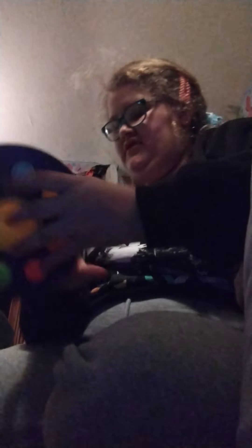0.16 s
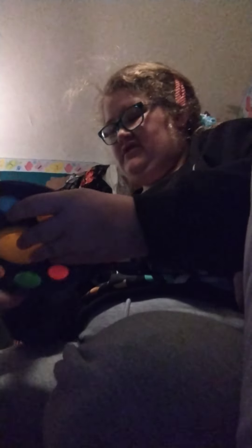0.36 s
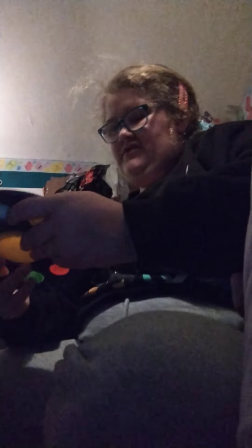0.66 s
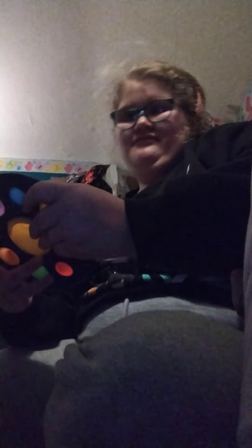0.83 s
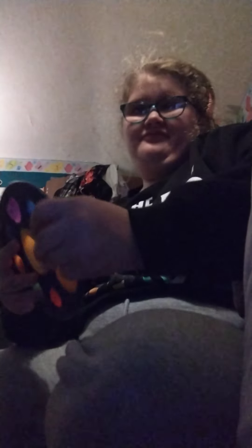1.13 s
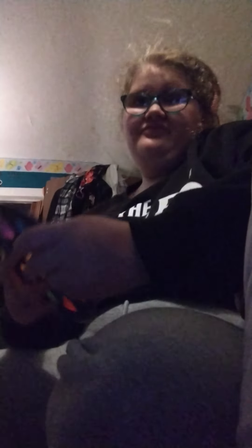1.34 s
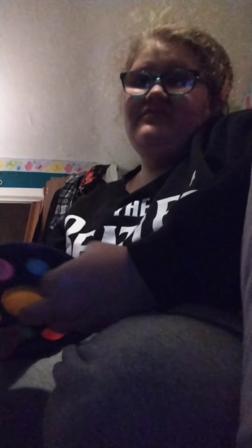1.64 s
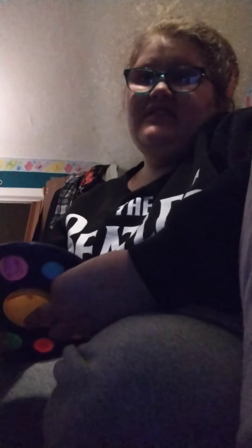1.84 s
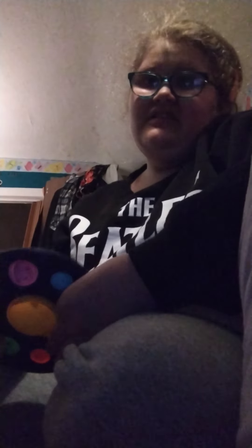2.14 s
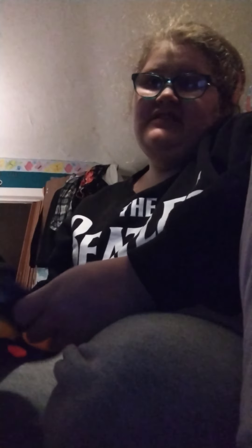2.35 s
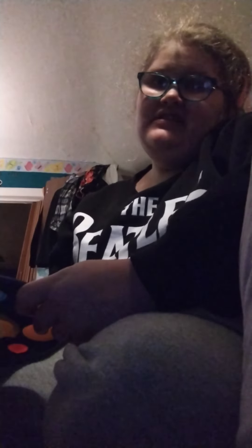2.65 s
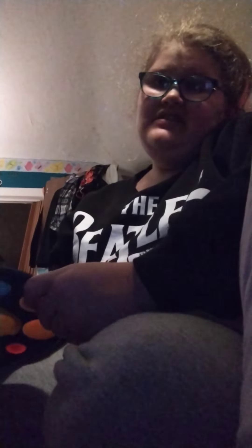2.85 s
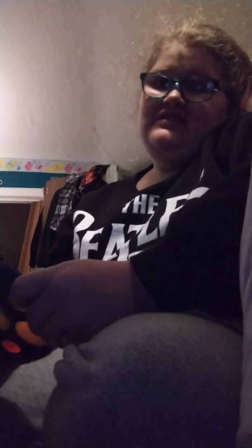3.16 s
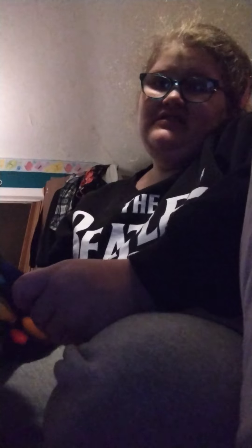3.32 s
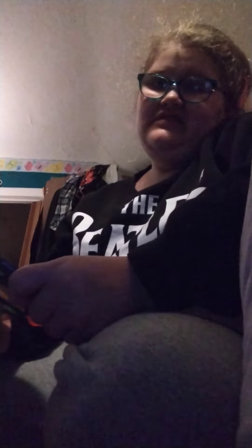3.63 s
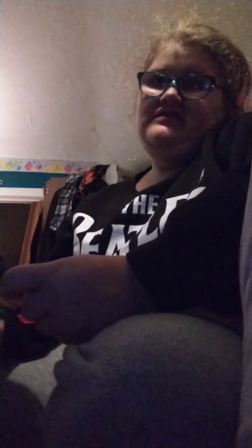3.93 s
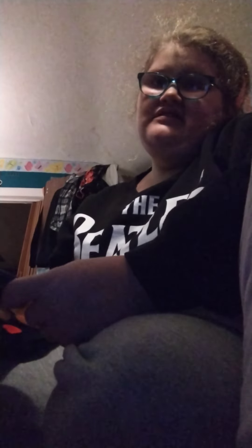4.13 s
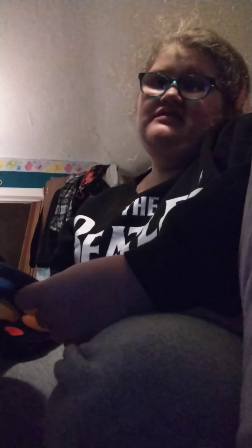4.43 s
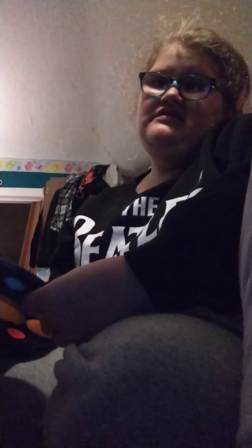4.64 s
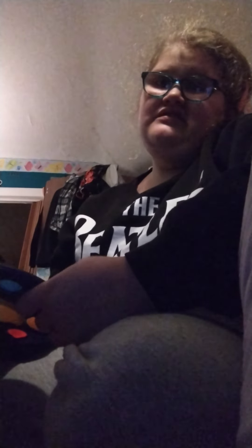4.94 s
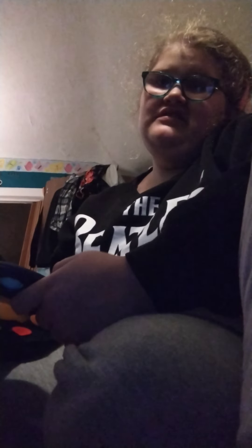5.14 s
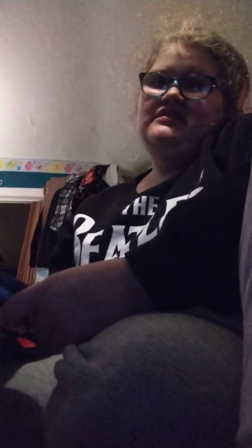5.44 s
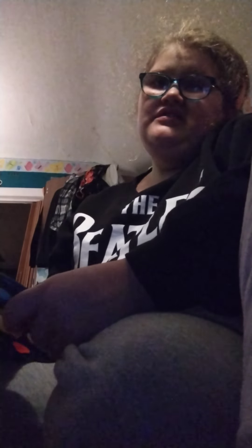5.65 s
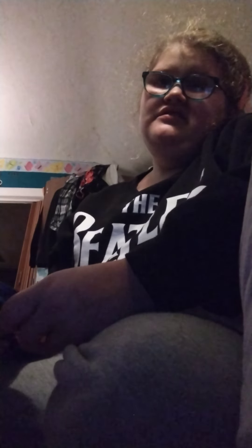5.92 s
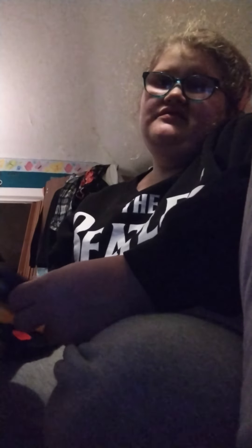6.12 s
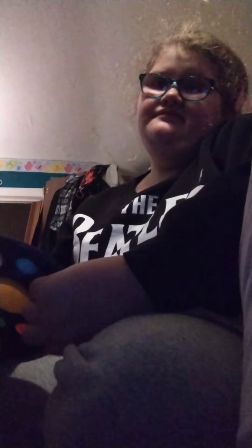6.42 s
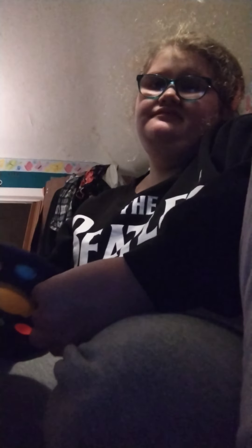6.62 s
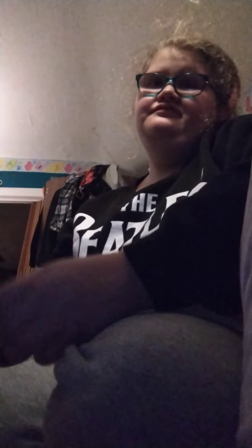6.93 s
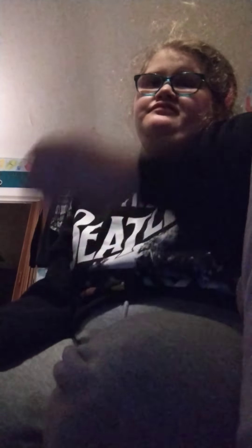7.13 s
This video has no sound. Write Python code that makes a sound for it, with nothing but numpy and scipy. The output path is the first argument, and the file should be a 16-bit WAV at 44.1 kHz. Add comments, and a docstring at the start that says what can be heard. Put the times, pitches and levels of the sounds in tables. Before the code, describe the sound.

Irregular crisp rubber pops and faint finger ticks, sleeve rustle, and a low motor drone that swells and sinks in pitch near the end.

```python
"""A rubber bubble toy is popped and handled close to a phone in a small soft room.
From the start a motor vehicle drones over rumble and still air: multiples of a firing rate, shaped noise.
Cloth hiss, low knocks, the first pops (ringing modes and crackling noise) and narrow hisses follow at once.
Pops and strokes recur; late on the drone swells and drops in pitch as the vehicle passes.
The phone's two ports colour the sound differently."""
import sys
import numpy as np
from scipy import signal
from scipy.fft import rfft, irfft, next_fast_len
from scipy.io import wavfile
from scipy.ndimage import uniform_filter1d, map_coordinates

SR = 44100
rng = np.random.default_rng(int(sys.argv[2]) if len(sys.argv) > 2 else 0)


def file_out(sig):
    """Save sig as 16-bit WAV at sys.argv[1]."""
    # one column per channel
    cols = np.atleast_2d(sig).T
    # limit, then scale
    lim = np.clip(cols, -1, 1)
    pcm = np.round(lim * 32767).astype(np.int16)
    wavfile.write(sys.argv[1], SR, pcm)


N = 320783

# vehicle firing rate before waver: time_s, rate_hz
FIRING_RATE = [(0, 68.6), (.5, 67.3), (1.2, 69), (2.6, 69.8), (3.7, 68), (4.2, 69.6), (5.4, 68.6),
               (6, 67.5), (6.5, 65), (7.27, 62.6)]
# second multiple of the firing rate: time_s, level_db
SECOND_MULTIPLE = [(0, -62), (.2, -57), (.5, -66.5), (.8, -54.5), (1.04, -66), (1.14, -54), (1.45, -58),
                   (1.8, -59.5), (2.401, -73), (2.6, -51.5), (2.8, -58), (3.601, -56), (4.2, -51.5),
                   (4.5, -49), (4.84, -45.5), (4.95, -51), (5.06, -43.5), (5.28, -45.5), (5.39, -50.5),
                   (5.65, -40.5), (5.83, -51), (5.94, -46.5), (6.05, -54.5), (6.16, -39), (6.38, -40),
                   (6.5, -47), (6.6, -42), (6.71, -35.5), (6.85, -30.5), (7.27, -39)]
# other multiples: time_s, first_db, third_db, fourth_db
OTHER_MULTIPLES = [(0, -67, -74, -87), (.6, -78, -83, -79), (1.4, -72, -68, -77.5), (2.1, -72, -74, -80),
                   (2.7, -71.5, -62, -80), (3.4, -72.5, -68, -82), (3.8, -60, -62, -72),
                   (4.1, -68, -68, -87.5), (4.65, -64, -56, -68.5), (5.2, -55, -56, -64),
                   (5.55, -50, -50.5, -72), (5.94, -56, -50, -54.5), (6.15, -59, -52.5, -63),
                   (6.3, -62, -49.5, -55), (6.7, -64, -54.5, -50.5), (6.93, -58.5, -54.5, -67.5),
                   (7.1, -52, -43.5, -58), (7.27, -60, -45.5, -59.5)]
# second low tone beside the drone: time_s, pitch_hz, level_db
THROB_TONE = [(2.35, 121.9, -87.5), (2.55, 120.6, -49.5), (2.8, 119.6, -50), (3.05, 121.4, -49),
              (3.3, 118, -53.5), (3.55, 117.6, -67)]
# road rumble bands: time_s, deep_db, middle_db, upper_db
ROAD_LEVELS = [(0, -64, -68.5, -81), (1.0, -69, -62, -72), (1.6, -70, -60, -60.5), (2.1, -62, -59, -78.5),
               (2.7, -58, -53.5, -62), (3.2, -61, -55.5, -85), (3.7, -70, -57, -68), (4.5, -74, -59, -84),
               (5.7, -63, -52.5, -64), (6.4, -68, -57, -71), (6.6, -66, -45.5, -54.5),
               (6.85, -60, -52, -60.5), (7.27, -61, -52.5, -50.5)]
# rumble spectrum: frequency_hz, density_db_per_hz
RUMBLE_SPECTRUM = [(20, -37.5), (45, -9.5), (80, -10.5), (110, -8), (170, -7.5), (250, -4.5), (350, -8.5),
                   (600, -19)]
# still room air spectrum: frequency_hz, density_db_per_hz
HUSH_SPECTRUM = [(180, -31), (300, -24.5), (392, -36), (617, -23), (682, -28.5), (1930, -36.5), (7890, -53),
                 (15200, -44.5), (16500, -65.5)]
# noise likeness between ports: frequency_hz, left_right_likeness (ratio)
LIKENESS = [(60, 0.94), (130, 1), (290, 0.89), (640, 0.39), (1410, -0.057), (3100, -0.18), (6820, 0.3),
            (15000, 0.097)]
# strokes over cloth: full_level_s, rise_s, hold_s, fall_s, hiss_db, body_db, low_db
CLOTH_STROKES = [(0.1, 0.093, .07, 0.098, -50.5, -60, -68.5), (0.375, 0.08, 0.017, 0.18, -64, -72.5, -81.5),
                 (0.705, 0.11, 0.033, 0.09, -61, -70, -68.5), (0.97, 0.081, 0.2, 0.14, -58, -63.5, -76.5),
                 (1.44, 0.31, 0.047, 0.53, -46, -54, -68), (1.74, 0.35, 0.033, 0.12, -53, -68, -76),
                 (2.05, .05, .03, .15, -66, -72, -70), (2.24, .45, .03, .16, -56.5, -74.5, -83.5),
                 (2.46, .07, .03, 0.51, -76, -74, -78.5), (2.78, 0.24, 0.018, .16, -64, -72, -77),
                 (2.9, .15, 0.035, 0.37, -71, -80.5, -78.5), (3.12, 0.059, 0.014, .09, -62.5, -86, -77),
                 (3.255, .07, .05, .12, -68.5, -68.5, -76.5), (3.545, .11, 0.027, 0.17, -62.5, -81.5, -77),
                 (3.69, .1, .03, .12, -64, -74, -64), (3.79, .06, .02, .15, -66.5, -67.5, -70.5),
                 (3.88, .2, .03, .12, -62, -80, -78), (3.945, .06, .05, .08, -59, -67, -73),
                 (4.16, 0.42, .17, 0.19, -61, -76.5, -78.5), (4.53, .08, .16, 0.09403, -67, -77, -79),
                 (4.885, 0.43, 0.026, .3, -78.5, -79, -88.5), (5.13, 0.036, .12, .1, -67.5, -78.5, -86.5),
                 (5.295, 0.11, .02, 0.21, -61, -70.5, -79.5), (5.465, 0.24, .02, .12, -63.5, -69.5, -83.5),
                 (5.585, .14, 0.014, 0.089, -65, -69.5, -65), (5.7, 0.071, 0.069, 0.15, -66, -66.5, -68.5),
                 (5.93, .15, .06, 0.2, -66, -72, -84), (6.07, .2, .04, .15, -63, -78, -84),
                 (6.24, .2, .04, .2, -66, -74, -88), (6.37, 0.076, .22, 0.085, -68, -79, -78.5),
                 (6.65, 0.089, 0.12, 0.28, -57.5, -67, -75), (6.88, 0.35, 0.037, .1, -52, -70, -81.5),
                 (6.965, .1, .02, 0.2, -45.5, -59.5, -74), (7.15, 0.16, .1, 0.28, -55, -73, -61)]
# cloth spectrum: frequency_hz, density_db_per_hz
CLOTH_SPECTRUM = [(210, -34.5), (350, -8), (507, -12.5), (723, -12), (877, -16), (1080, -14.5),
                  (1270, -16.5), (2420, -15.5), (2670, -15.5), (6070, -12), (7490, -5), (9850, -12.5),
                  (12300, -8.5), (15200, -19.5), (16500, -16.5)]
# nudges of the phone: start_s, pitch_hz, level_db, t60_s
NUDGES = [(0.066, 126.2, -34, 0.049), (0.074, 132.8, -15.5, 0.074), (6.409, 95, -32, .08),
          (6.94, 88, -31, 0.12)]
# pops and finger ticks: start_s, snap_db, hollow_db, skin_db, crackle_db, left_minus_right_db,
# dome_pitch_ratio
POP_EVENTS = [(0.07, -11.5, -33, -39.5, -14, 2.5, 0.936), (0.0779, -7.5, -35.5, -30.5, -15.5, -1, 1.06),
              (0.0875, -23.5, -25, -19.5, -20.5, -6, 0.974), (0.0946, -18.5, -33.5, -32.5, -19.5, 2, 0.81),
              (0.335, -73, -83, -71, -40.5, 14.5, .98), (0.39, -62, -65, -68, -41.5, 4, 1.3),
              (0.7045, -42, -37.5, -30.5, -36.5, 0, 1.02), (0.919, -44.5, -91, -78, -45.5, -3.5, 0.982),
              (0.9791, -31, -41, -50, -29, -5, 0.85), (2.0005, -4, -18.5, -8.5, -9, -2.5, 1.03),
              (2.4512, -44, -72.5, -65, -49.5, 8, 0.86), (2.5262, -49.5, -62, -78, -49.5, -1, 0.86),
              (2.6933, -32, -53, -69, -64, 6, 0.72), (3.0056, -57, -75, -84, -43, 12.5, 0.79),
              (3.5961, -21.5, -38.5, -44, -21.5, -1, .98), (3.625, -4.5, -21, -20.5, -13, 2, 1.05),
              (3.6346, 1.5, -21, -11.5, -19, 2.5, 1.03), (3.7863, -36, -75, -60, -40, -6.5, 0.94),
              (4.6115, -6.5, -20, -15.5, -11, -0.5, 0.8981), (5.244, -58, -46.5, -58.5, -34, -0.5, 0.95),
              (5.2777, -62, -76, -69, -41, -7, .98), (5.4633, -44, -48, -66.5, -39.5, 0.5, 0.85),
              (5.5318, -35.5, -26.5, -39, -35, -1.5, .98), (5.691, -18, -26.5, -28.5, -23.5, -2.5, .98),
              (5.7188, -31, -54, -60, -36, -5, 1.1), (5.8512, -40, -63, -65, -46.5, -10, 1.0006),
              (6.4087, -5.5, -19.5, -20, -4.5, -2, 0.9557), (6.4706, -29.5, -31.5, -40, -18.5, 2, 0.96),
              (6.6379, -.5, -16, -10.5, 3.5, 1.5, 1.05), (6.9379, -15.5, -31.5, -35, -20.5, -3, 0.84),
              (6.9618, -54, -50, -41, -16.5, 10.5, .98), (6.9875, -57, -47, -62, -33, 1, 0.76),
              (7.003, -28.5, -43, -60, -49, -2, 0.77), (7.0241, -56, -50, -62, -29.5, -2.5, 0.84),
              (7.0404, -51, -59, -69, -40, 5, .98)]
# snap and crackle spectrum: frequency_hz, density_db_per_hz
SNAP_SPECTRUM = [(530, -36), (900, 4), (1610, -9), (2140, -4), (2560, -12), (3040, -6), (3900, -4),
                 (4950, -11.5), (7390, 0), (8450, 0), (9540, -8.5), (14100, -12), (15900, -23.5),
                 (16500, -41)]
# dome air modes at pitch ratio 1: pitch_hz, level_db, t60_s
HOLLOW_MODES = [(138, -13, 0.023), (287, -3, .025), (396, -6.5, .02), (494, 0.5, 0.021), (648.8, -3, 0.018)]
# dome rubber modes at pitch ratio 1: pitch_hz, level_db, t60_s
SKIN_MODES = [(796, 0.5, 0.0096), (963, -2.5, 0.012), (1280, -0.5, 0.0059)]
# room decay: frequency_hz, t60_s
ROOM_DECAY = [(150, 0.28), (500, 0.16), (2000, 0.11), (8000, 0.12), (15000, 0.085)]
# narrow hisses, ticks to faint whistles: start_s, end_s, centre_hz, width_hz, level_db
NARROW_HISSES = [(.115, 0.215, 1599, 450, -58.5), (0.241, 0.642, 3600, 170, -79),
                 (.22, 0.652, 1850, 220, -80.5), (0.593, 0.762, 3056, 497, -70.5),
                 (1.057, 1.072, 2010, 699, -59), (1.096, 1.121, 1490, 350, -56.5),
                 (1.6471, 1.6478, 7200, 1600, -35), (1.7204, 1.7218, 7200, 1600, -39),
                 (1.916, 1.926, 1000, 500.2, -68), (2.1, 2.95, 2980, 140, -84), (2.51, 2.9, 3720, 110, -82),
                 (2.428, 2.945, 2030, 118.8, -84), (3.24, 3.34, 2700, 900, -68),
                 (3.42, 3.59, 850, 120, -77.5), (4.05, 4.37, 653, 50.19, -72.5),
                 (5.668, 5.668, 8894, 1501, -58), (5.9, 5.97, 3030, 1300, -71),
                 (6.212, 6.217, 2199, 397.8, -64.5), (7.13, 7.16, 950, 249.6, -70),
                 (7.181, 7.189, 1050, 250, -48), (7.194, 7.204, 1000, 250, -56),
                 (7.239, 7.253, 995, 200, -57), (7.13, 7.294, 2930, 400, -73)]
# port colour: frequency_hz, left_minus_right_db
PORT_COLOUR = [(60, 4.5), (92, 4), (140, 3.5), (210, 4.5), (330, 5.5), (500, 6), (770, -2), (1170, 1.5),
               (1790, -3), (2740, -7), (4190, -3), (6410, -18.5), (9810, -4.5), (15000, 20.5)]

FAR_WAVER_DB, NEAR_WAVER_DB = 3, 0.8  # the faint drone wavers more
FIFTH_DB = -14.5  # against the fourth multiple
HUSH_DB = -88
FADE_DB = 20  # lost over one rise or fall time
SNAP_T60_S, CRACKLE_T60_S = 0.022, 0.018
TOP_HZ = 15900


def amp(db):
    """Decibels to amplitude."""
    return 10 ** (np.asarray(db) / 20)


def unit(x):
    """Scale to rms 1."""
    return x / np.sqrt(np.mean(x ** 2) + 1e-20)


def along(points, hz):
    """Interpolate (Hz, value) points on a log frequency axis."""
    f, v = np.transpose(points)
    return np.interp(np.log(hz + 1), np.log(f + 1), v)


def curves(rows):
    """One value per sample for each column after the time."""
    time_s, *cols = np.transpose(rows)
    return [np.interp(np.arange(N) / SR, time_s, c) for c in cols]


def wobble(rate_hz):
    """Smooth random curve, rate_hz knots a second."""
    knots = rng.standard_normal(int(N * rate_hz / SR) + 4)
    return map_coordinates(knots, [np.arange(N) * rate_hz / SR])


def filtered(x, response):
    """Apply a complex frequency response."""
    m = next_fast_len(N + SR // 2)
    return irfft(rfft(x, m) * response(np.fft.rfftfreq(m, 1 / SR)), m)[..., :N]


def band(hz, lo_hz, hi_hz):
    """Gain of a steep band-pass."""
    return 1 / np.sqrt((1 + (lo_hz / (hz + 1)) ** 8) * (1 + (hz / hi_hz) ** 8))


def rush(gain, patchy_db, grit_db=0):
    """Stereo noise of rms 1: random gain patches in time and frequency, fast gain grit, partial likeness."""
    z = signal.stft(rng.standard_normal((2, N)), nperseg=256)[2]
    field = rng.standard_normal(z.shape[1:])
    field = uniform_filter1d(uniform_filter1d(field, 5, 0), 10, 1)
    patchy = signal.istft(z * amp(patchy_db * unit(field)), nperseg=256)[1][:, :N]
    pair = patchy * amp(grit_db * wobble(300))

    def mid_side_gain(hz):
        turn = np.arccos(np.clip(along(LIKENESS, hz), -1, 1)) / 2
        return gain(hz) * np.array([np.cos(turn), np.sin(turn)])

    mid, side = filtered(pair, mid_side_gain)
    return unit(np.array([mid + side, mid - side]))


def tone(hz):
    """Sine of rms 1 that follows a pitch curve."""
    return np.sqrt(2) * np.sin(2 * np.pi * (np.cumsum(hz) / SR + rng.random()))


def traffic():
    """Five unsteady multiples of the firing rate and a low throb, over three bands of road rumble."""
    (rate_hz,) = curves(FIRING_RATE)
    (second_db,) = curves(SECOND_MULTIPLE)
    first_db, third_db, fourth_db = curves(OTHER_MULTIPLES)
    rate_hz = rate_hz * (1 + 0.003 * wobble(7.7))
    waver_db = np.interp(second_db, [-58, -42], [FAR_WAVER_DB, NEAR_WAVER_DB])
    levels_db = [first_db, second_db, third_db, fourth_db, fourth_db + FIFTH_DB]
    drone = np.zeros(N)
    for multiple, db in enumerate(levels_db, start=1):
        drone += amp(db + waver_db * wobble(9)) * tone(multiple * rate_hz)

    throb_hz, throb_db = curves(THROB_TONE)
    throb = amp(throb_db + 0.7 * wobble(27)) * tone(throb_hz + 1.5 * wobble(3.1))

    deep_db, middle_db, upper_db = curves(ROAD_LEVELS)
    road = np.zeros((2, N))
    for lo_hz, hi_hz, db in [(15, 69, deep_db), (62, 152, middle_db), (179, 270, upper_db)]:
        colour = lambda hz: amp(along(RUMBLE_SPECTRUM, hz)) * band(hz, lo_hz, hi_hz)
        road += amp(db) * rush(colour, patchy_db=0.5)
    return drone + throb + road


def room_air():
    """Steady faint noise of the still room."""
    return amp(HUSH_DB) * rush(lambda hz: amp(along(HUSH_SPECTRUM, hz)), patchy_db=2.5)


def cloth():
    """Sleeves and toy slide over fabric: strokes rise, hold and fall in gritty hiss, body and low noise."""
    t, power = np.arange(N) / SR, np.zeros((3, N))
    for full_s, rise_s, hold_s, fall_s, *levels_db in CLOTH_STROKES:
        before = (full_s - t) / abs(rise_s)
        after = (t - full_s - hold_s) / abs(fall_s)
        away = np.maximum(before, after).clip(0)
        power += np.outer(amp(levels_db), amp(-FADE_DB * away)) ** 2
    hiss, body, low = np.sqrt(power)
    colour = lambda lo_hz, hi_hz: lambda hz: amp(along(CLOTH_SPECTRUM, hz)) * band(hz, lo_hz, hi_hz)
    flutter = amp(1.7 * wobble(25))
    return (hiss * flutter * rush(colour(5600, 17000), patchy_db=0.5, grit_db=2)
            + body * flutter * rush(colour(1150, 4800), patchy_db=0.5, grit_db=2)
            + low * rush(colour(380, 1150), patchy_db=1.5))


def bumps():
    """Nudges send low, decaying knocks through the phone's body."""
    out, t = np.zeros(N + SR), np.arange(SR // 3) / SR
    for start_s, hz, db, t60_s in NUDGES:
        onset = 1 - np.exp(-t / 0.003)
        knock = amp(db - 60 * t / t60_s) * np.sin(2 * np.pi * hz * t) * onset
        out[round(start_s * SR):][:len(t)] += knock
    return out[:N]


def ring(modes, t):
    """Damped modes at new random strengths, a little different at each port."""
    hz, db, t60_s = np.transpose(modes)[:, :, None]
    shared_db = rng.normal(0, 1.5, len(modes))
    port_db = rng.normal(0, 2, (2, len(modes)))
    decaying = amp(db - 60 * t / t60_s) * np.sin(2 * np.pi * hz * t)
    return amp(shared_db + port_db) @ decaying * (1 - np.exp(-(t / 0.00052) ** 2))


def pops():
    """A dome flips: a push of air rings hollow and skin, and the rubber crackles in a few milliseconds."""
    thud, snap, crackle = np.zeros((3, 2, N + SR))
    t = np.arange(SR // 30) / SR
    for start_s, snap_db, hollow_db, skin_db, crackle_db, pan_db, pitch in POP_EVENTS:
        at = round(start_s * SR)
        span = slice(at, at + len(t))
        side = amp([[pan_db / 2], [-pan_db / 2]])
        # uneven sub-cracks, each 14 samples long
        slips = amp(2.5 * np.repeat(rng.standard_normal(len(t) // 14 + 1), 14)[:len(t)])
        shape = slips * np.clip((t - 0.0003) / 0.0011, 0, 1)
        noise = rng.standard_normal((3, len(t)))
        noise = 0.23 * noise[0] + noise[1:]  # partly shared by the ports
        hollow = amp(hollow_db) * ring(HOLLOW_MODES, t * pitch)
        skin = amp(skin_db) * ring(SKIN_MODES, t * pitch)
        thud[:, span] += side * (hollow + skin)
        snap[:, span] += side * amp(snap_db - 60 * t / SNAP_T60_S) * shape * noise
        crackle[:, span] += side * amp(crackle_db - 60 * t / CRACKLE_T60_S) * shape * noise
    colour = lambda hz: amp(along(SNAP_SPECTRUM, hz))
    toy = (thud[:, :N]
           + filtered(snap, lambda hz: colour(hz) * band(hz, 1100, 5400) ** 2)
           + filtered(crackle, lambda hz: colour(hz) * band(hz, 5400, 17000)))
    lag_s = 0.00018 * np.array([[0.5], [-0.5]])  # the toy is nearer the right port
    return filtered(toy, lambda hz: np.exp(-2j * np.pi * hz * lag_s))


def room(x):
    """Two walls answer once each in the treble; the diffuse tail is redrawn as hands and toy move."""
    out, step = np.zeros((2, N + SR)), SR // 4
    for at in range(0, N, step):
        hz, t, z = signal.stft(rng.standard_normal((2, step)), SR, nperseg=128)
        decay = amp(-60 * t / along(ROOM_DECAY, hz)[:, None])
        tail = signal.istft(z * decay, SR, nperseg=128)[1]
        tail *= np.clip(np.arange(tail.shape[1]) / SR / 0.016, 0, 1) ** 2  # build-up
        wet = signal.fftconvolve(x[:, at:at + step], tail / np.linalg.norm(tail[0]), axes=1)
        out[:, at:at + wet.shape[1]] += wet
    walls_s = np.array([[0.0165], [0.0232]])
    echoes = lambda hz: np.exp(-2j * np.pi * hz * walls_s).sum(axis=0)
    wall = filtered(x, lambda hz: band(hz, 3700, 14000) * echoes(hz))
    return amp(-26) * wall + amp(-20) * out[:, :N]


def whistles():
    """Short bands of narrow, flickering hiss."""
    out, t = np.zeros((2, N)), np.arange(N) / SR
    for start_s, end_s, centre_hz, width_hz, db in NARROW_HISSES:
        edge_s = 0.25 * (end_s - start_s)
        gate = np.clip(np.minimum(t - start_s, end_s - t) / edge_s, 0, 1)
        bell = lambda hz: np.exp(-((hz - centre_hz) / width_hz) ** 2)
        hiss = filtered(rng.standard_normal((2, N)), bell)
        out += gate * amp(db + 2.5 * wobble(40)) * unit(hiss)
    return out


def scene():
    """Sum the sources; only the pops excite the room."""
    toy = pops()
    return traffic() + room_air() + cloth() + bumps() + toy + room(toy) + whistles()


def record(dry):
    """Ports colour each side and cut deep bass; peaks are rounded, then all above TOP_HZ is removed."""
    ports = lambda hz: amp(along(PORT_COLOUR, hz) * np.array([[0.5], [-0.5]]))
    bass_cut = lambda hz: (1j * hz / (1j * hz + 55)) ** 2
    loud = filtered(dry, lambda hz: ports(hz) / ports(hz).mean(axis=0) * bass_cut(hz))
    loud = loud / (1 + np.abs(loud / 0.85) ** 6) ** (1 / 6)
    return filtered(loud, lambda hz: hz < TOP_HZ)


dry = scene()
out = record(dry)
file_out(out)
```